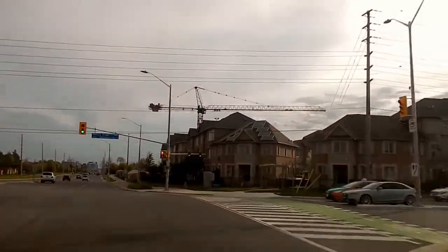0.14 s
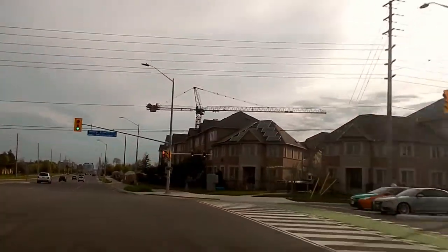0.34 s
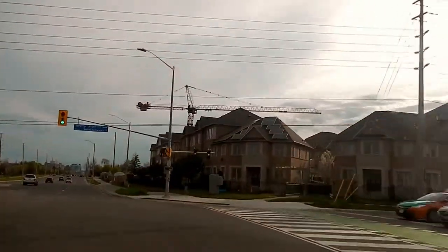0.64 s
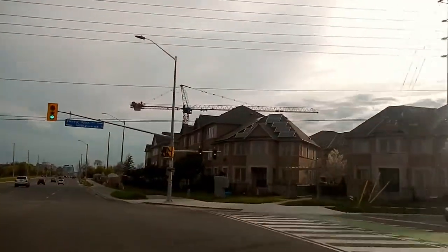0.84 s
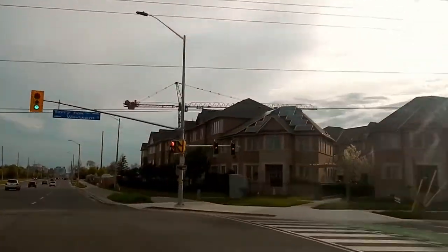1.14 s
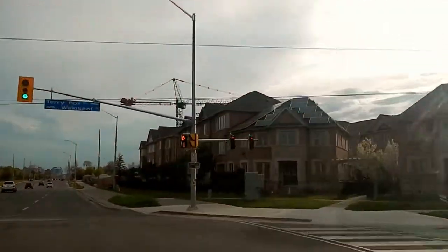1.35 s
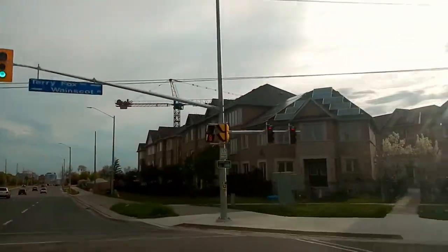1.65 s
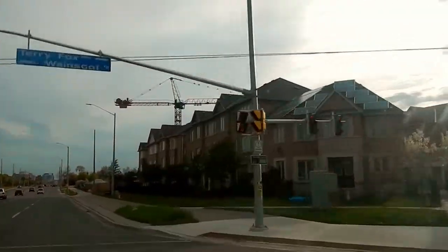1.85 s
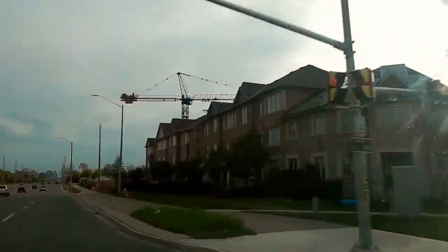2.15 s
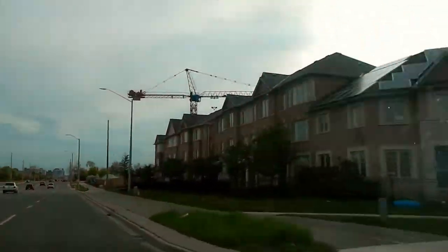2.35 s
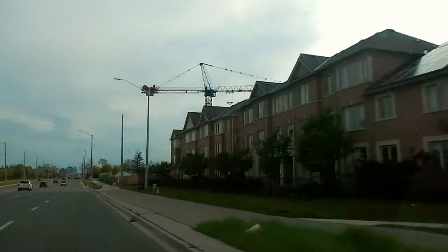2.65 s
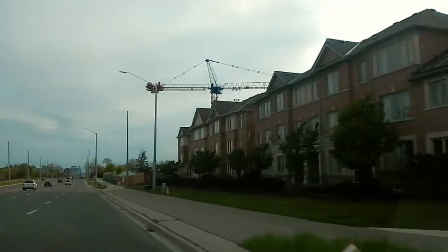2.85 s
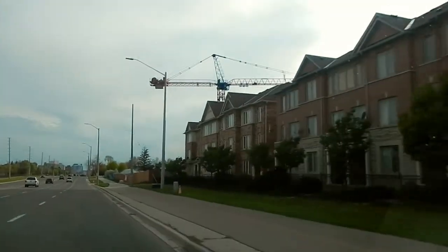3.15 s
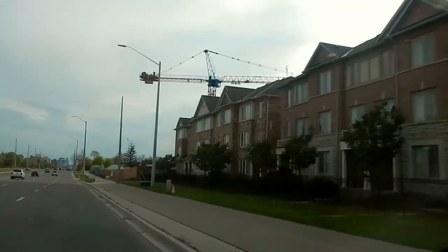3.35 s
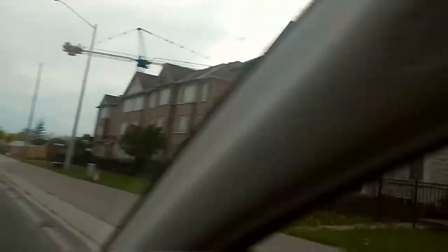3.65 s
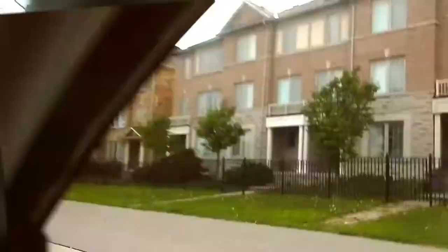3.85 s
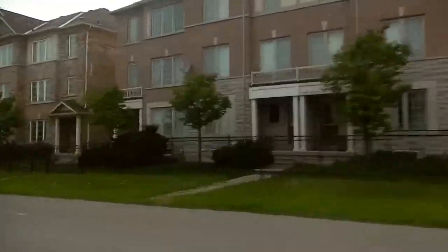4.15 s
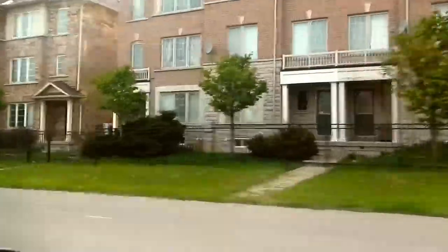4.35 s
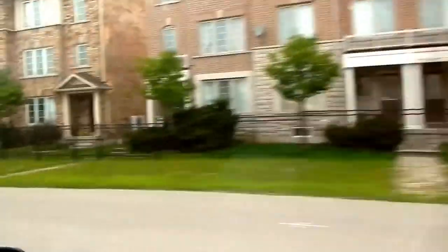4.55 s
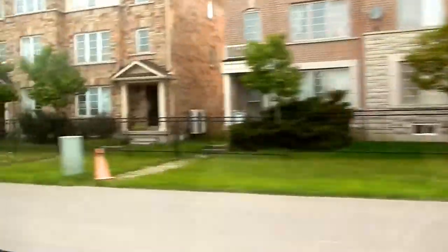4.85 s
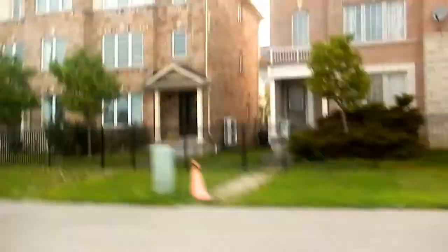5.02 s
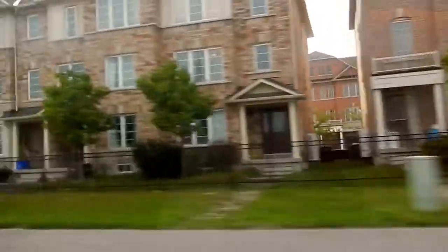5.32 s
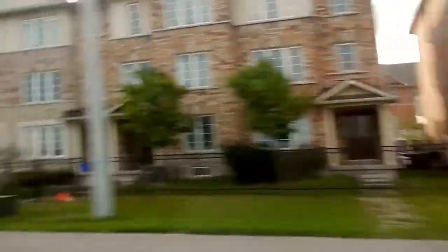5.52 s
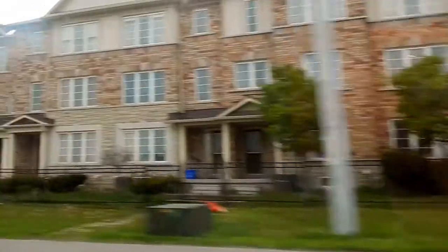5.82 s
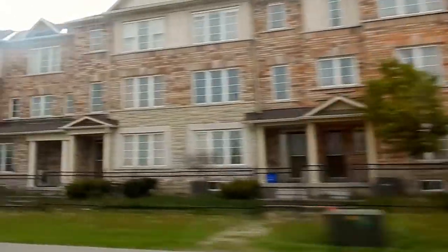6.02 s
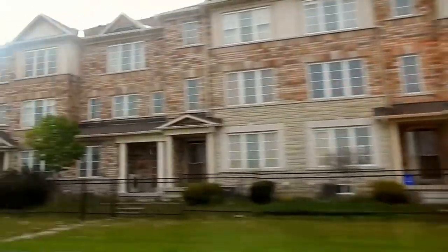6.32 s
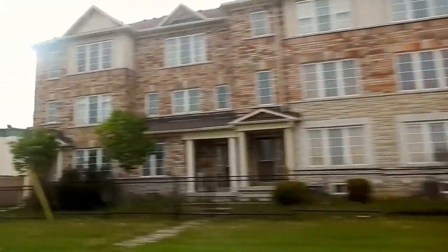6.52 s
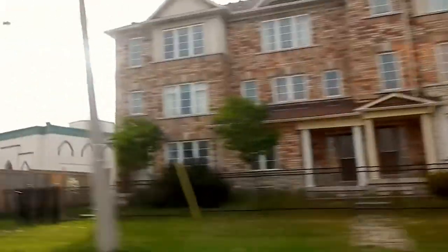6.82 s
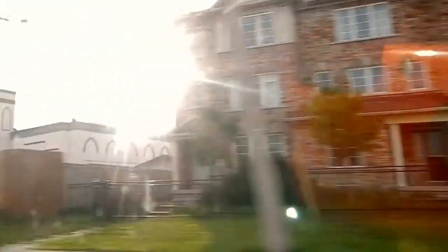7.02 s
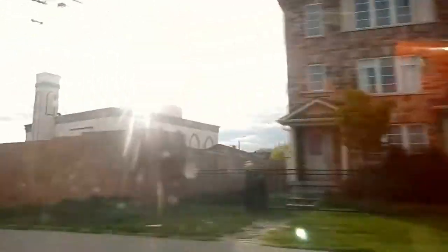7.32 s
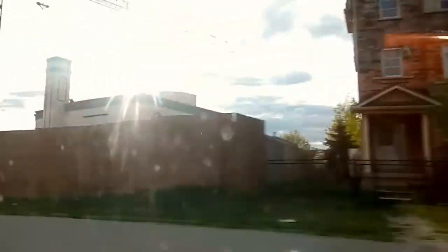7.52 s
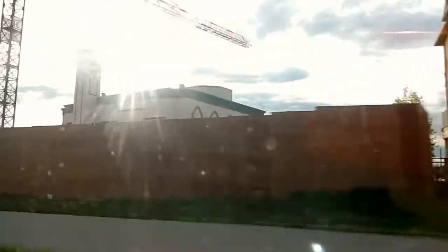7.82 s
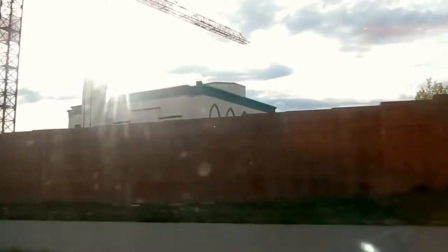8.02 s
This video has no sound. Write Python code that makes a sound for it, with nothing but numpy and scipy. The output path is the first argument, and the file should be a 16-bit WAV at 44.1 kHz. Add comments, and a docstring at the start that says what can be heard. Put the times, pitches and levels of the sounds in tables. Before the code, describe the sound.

Steady boomy car-cabin road noise with soft bumps grows fuller after a few seconds, joined by fabric rustling, a brief seat creak and small rattles.

```python
"""Inside a car, microphone turned to the side window

A suburban road heard from the cabin, the speed drifting a little. Noise bands filtered to the resonances of body,
cabin, floor pan, tyres and glass make the road; struck modes make seams and dips. Midway a passenger turns the
microphone from the windscreen to the side window: most of the road grows louder. Shaped noise makes the clothing
rustle and snag; short squeaks make the seat creak; noise bursts and struck modes make trim tick and chink."""
import sys
import numpy as np
from scipy.fft import rfft, irfft
from scipy.io import wavfile
from scipy.ndimage import uniform_filter1d, map_coordinates

SR = 44100
rng = np.random.default_rng(int(sys.argv[2]) if len(sys.argv) > 2 else 0)


def transcribe(u):
    """Save the signal u as a 16-bit wav file named by the first command-line argument.

    u: samples, shape (n,) or (channels, n), limited to [-1, 1]; the rate is SR.
    q: integer samples, one column per channel.
    """
    v = np.clip(np.atleast_2d(u).T, -1, 1)
    q = np.round(v * 32767).astype(np.int16)
    wavfile.write(sys.argv[1], SR, q)


N = 360297
TIME = np.arange(N) / SR  # s
FREQ = np.maximum(np.fft.rfftfreq(N, 1 / SR), 1)  # Hz
BLOW_LENGTH = SR // 4  # samples in each short sound
BLOW_TIME = TIME[:BLOW_LENGTH]

# Levels of layers and events are those ahead of the stereo tilt and the microphone's own response.
# Levels of modes and noise colours are relative within their sound.

# Where the microphone points. Each row: time in seconds, direction from 0 (windscreen) to 1 (side window).
MIC_DIRECTION = [(0, 0.038), (3.33, 0.11), (3.7, 0.79), (4.3, 0.99), (8.17, 0.84)]
# Speed of the car. Each row: time in seconds, share of cruising speed.
CAR_SPEED = [(0, 0.97), (2.7, 1), (4.3, 0.94), (6.7, 1.012), (8.17, 0.99)]
SPEED_LAW_DB = 32.5  # road noise gained per tenfold speed

# Road layers at cruising speed: dB at the windscreen, dB at the side window.
SHAKE_DB, BOOM_DB, FLOOR_DB = (-34, -34.5), (-27.5, -26), (-35.5, -26.5)
DRONE_DB, ROAR_DB, WHINE_DB = (-38, -32.5), (-40, -35), (-75.5, -55)
SHAKE_SHARE = 0.46  # how far the body follows the boom's changes with the asphalt, in dB per dB

# The body on its springs. Each row: pitch in Hz, width in Hz, level in dB.
BODY_MODES = [(37.9, 5.3, 2.5), (20, 39, -13)]
# Resonances of the cabin air, of the floor pan, of the tyres, and of doors and glass in the roar.
# Each row: pitch in Hz, width in Hz, level in dB at the windscreen, level in dB at the side window.
CABIN_MODES = [(58.9, 8.1, -1.5, -23.5), (82.8, 25.3, -9, 0), (104.6, 15.1, 2, -1), (122.5, 16.7, -3, -8)]
FLOOR_PAN_MODES = [(146, 24.7, 2, 2), (186.2, 16.6, 4.5, -5.5), (209.7, 15, 2, -6.5),
                   (262.5, 39.6, -5.5, -11.5)]
TYRE_MODES = [(374.2, 52, -11, 4), (402, 35.5, -4, -2), (426, 56.6, 1, -6.5), (488, 29.5, -6.5, -5)]
GLASS_MODES = [(672.5, 82, -5, 0.5), (832.6, 32, 2.5, -11), (934, 25, -6.5, -0.5), (1076, 117, -13.5, -6.5),
               (1309, 77, -22.5, -5), (1530, 130, -12, -15), (1861, 74, -15.5, -11.5)]
# Broad tread roar. Each row: frequency in Hz, noise density in dB per Hz.
ROAR_COLOUR = [(150, 3.5), (330, -0.5), (540, 0.5), (780, -2), (1000, -7.5), (1400, -14), (1900, -15),
               (2200, -25.5), (2900, -28.5), (3700, -23), (4600, -32.5), (5700, -34), (7200, -51),
               (15000, -47)]
# Rougher (+) and smoother (-) stretches of asphalt. Each row: start in seconds, length in seconds,
# change of the cabin boom in dB, of the floor pan in dB, of the tyre drone in dB.
ASPHALT_PATCHES = [(0, 0.22, -4.5, 2, -1), (0.987, 0.22, 1, 0, -3), (1.198, .33, -2, -0.5, 0),
                   (1.9, 0.19, -4.5, -1, -0.5), (3.15, 0.1, 2, 1, 0.5), (3.256, 0.14, -4, 0.5, -1.5),
                   (3.415, 0.44, 5.5, 0, 3), (4.157, 0.39, 0, 1, 1), (4.553, 0.081, 6.5, 0, 0),
                   (4.723, 0.49, 2.5, 2.5, 1), (5.206, 0.072, -8, -4, -1), (5.58, 0.34, -1, -0.5, -1),
                   (6.06, .18, 1.5, 1.5, 0.5), (6.22, 0.61, 6.5, 1, 0.5), (7.01, 0.15, -2, -1, -2),
                   (7.196, 0.22, 5, -0.5, -1), (7.52, .4, 5, 0, 1)]
PATCH_EDGE_S = 0.025  # the time it takes to roll onto or off a patch
# Coarse and fine asphalt. Each row: peak in seconds, rise in seconds, fall in seconds, change of the roar in dB.
ROAR_SURGES = [(3.31, 0.035, 0.076, -1.5), (3.42, 0.028, 0.028, 2), (3.51, .03, .03, -2.5),
               (3.76, .04, .04, 1), (4.315, 0.038, .025, 3), (4.39, 0.017, .04, 1.5),
               (4.65, .05, 0.036, -0.5), (4.82, 0.068, .05, 1), (5.23, .04, 0.053, -0.5),
               (5.57, .04, 0.036, -2), (6.45, 0.032, 0.11, 1), (6.79, 0.11, 0.031, 1)]
# Whine of the tread pattern. Each row: peak in seconds, rise in seconds, fall in seconds, level in dB.
WHINE_SWELLS = [(4.4, 0.27, .25, -56), (5.15, 0.25, 0.25, -49.5), (6.75, 0.64, 0.65, -50.5)]
# Narrow bands within the whine. Each row: pitch in Hz, width in Hz, level in dB.
WHINE_BANDS = [(1291, 25, -5), (1366, 38, -6), (1546, 32, 1.5), (1594, 26, 0.5)]
WHINE_WAVER, WHINE_FLUTTER_DB = 0.006, 1.6  # wander as a share of pitch; random swing of level

# Seams under the tyres, and dips in the road. Each row: start in seconds, peak level in dB, pitch in Hz.
SEAM_KNOCKS = [(.44, -28, 425), (.958, -23, 423), (1.02, -22, 420), (1.177, -21.5, 420), (1.438, -22, 417),
               (1.548, -25, 400), (1.646, -22.5, 412), (2.711, -24.5, 444), (3.152, -21.5, 417),
               (4.08, -24, 363), (4.695, -23, 388), (5.318, -21, 425), (6.135, -24, 382), (6.228, -21, 420),
               (6.326, -20, 393), (6.846, -24, 398), (7.554, -22, 400)]
DIP_THUDS = [(.633, -18, 118), (1.068, -18, 96), (1.68, -20, 116), (1.841, -17, 108), (2.13, -17, 108),
             (3.44, -14.5, 94), (3.608, -14, 98), (3.73, -11, 89), (4.036, -17, 116), (4.307, -14, 100),
             (4.818, -15, 97), (6.233, -16, 97), (6.515, -13.5, 86), (6.594, -13, 96), (6.783, -14, 108),
             (7.345, -13, 96)]
# Modes of a seam knock and of a dip thud. Each row: multiple of the pitch, level in dB, t60 in seconds.
SEAM_RING = [(1, 1, 0.14), (.94, -9.5, 0.13), (1.16, -9.5, 0.039), (.52, -6.5, 0.05), (2.19, -18.5, 0.034)]
DIP_RING = [(1, 14.5, 0.17), (1.34, -9, 0.02)]

# Clothing over the seat, close by. Each row: peak in seconds, rise in seconds, fall in seconds,
# level of the rustle in dB, level of the fibres' sheen in dB.
CLOTH_STROKES = [(.8, 0.13, 0.19, -63, -88), (1.35, 0.13, 0.13, -62, -90), (2.08, 0.13, 0.088, -58, -84),
                 (3.75, 0.5, .42, -49.5, -71.5), (3.6, .06, .06, -57, -78), (3.69, .03, 0.032, -47.5, -70),
                 (3.78, 0.015, 0.057, -45.5, -64.5), (3.875, .02, .03, -53, -65),
                 (4.2, 0.23, 0.18, -51, -71), (4.31, 0.045, 0.13, -43.5, -63),
                 (4.47, 0.079, 0.054, -46, -64), (4.57, 0.065, 0.058, -49.5, -67),
                 (4.665, 0.067, 0.051, -47.5, -64), (4.79, .08, .05, -61, -77),
                 (4.99, 0.075, 0.1, -51.5, -66), (5.12, .06, 0.077, -54, -76),
                 (5.218, 0.047, 0.033, -43.5, -71), (5.32, 0.066, 0.065, -54, -76),
                 (5.43, 0.067, 0.05, -46.5, -72), (5.51, 0.017, 0.027, -45, -60),
                 (5.565, 0.019, 0.018, -42.5, -60), (5.63, 0.066, 0.12, -47, -67),
                 (5.83, 0.16, 0.044, -46, -62.5), (5.93, 0.049, 0.05, -53, -67),
                 (6.745, 0.09, 0.062, -58, -83)]
# Colours of rustle and sheen. Each row: frequency in Hz, noise density in dB per Hz.
CLOTH_COLOUR = [(700, 0.5), (1500, 6.5), (2200, 2), (2600, -2.5), (3000, 2.5), (3800, 6.5), (4500, -3),
                (5750, -1), (7000, -12), (8100, -20.5), (15000, -33)]
SHEEN_COLOUR = [(6000, -19), (8200, -6.5), (9400, -1.5), (11500, -5.5), (15000, -20)]
CLOTH_SPLIT_HZ, CLOTH_PATCHY_DB = 4700, 1.3  # the rustle flickers apart below and above this frequency
# Cloth jerking free. Each row: start in seconds, peak level in dB.
CLOTH_SNAGS = [(3.777, -34), (3.786, -36), (3.81, -37), (3.836, -37), (4.335, -36), (4.351, -35),
               (4.482, -37), (5.217, -33)]
SNAG_T60_S = 0.015

# Creaks of the seat. Each row: start in seconds, number of slips, base gap in seconds, peak level of the
# first slip in dB before scatter, fall in dB per slip.
SEAT_CREAKS = [(5.5076, 2, .0097, -26.5, 5), (5.5627, 1, .012, -22, 0), (5.5848, 8, .0123, -23.6, .5)]
SLIP_SLOWING_S, SLIP_JITTER_S = 0.00054, 0.0002  # each gap outlasts the one before; random timing
SLIP_SCATTER_DB, CREAK_RIGHT_DB = 0.8, 3  # random level; how much louder the squeak is on the right
SQUEAK_HZ, SQUEAK_S, SQUEAK_SUB_DB = 3770, 0.0022, -9  # mean pitch; length; the octave below
SNAP_DB, SNAP_T60_S = -2, 0.016  # the snap, against the squeak's main tone
# Colour of the snap. Each row: frequency in Hz, noise density in dB per Hz.
SNAP_COLOUR = [(700, -3), (1800, 4), (2500, -1.5), (2900, 0), (4200, -3), (4900, -12), (6300, -9),
               (7300, -22), (12000, -34)]

# Plastic trim. Each row: start in seconds, peak level in dB, pitch in Hz, width in Hz, t60 in seconds.
TRIM_TICKS = [(2.173, -43, 4600, 2200, .04), (4.305, -30, 1500, 1200, .025), (5.834, -35, 4000, 1200, .02),
              (5.866, -33, 4150, 500, .008), (6.098, -45, 4000, 800, .03), (6.352, -45, 4400, 800, .012),
              (6.725, -43.5, 3600, 700, .03), (7.183, -48, 5500, 900, .02), (7.624, -45.5, 5550, 350, .06),
              (7.928, -39.5, 4000, 800, .07), (8.001, -47, 5750, 450, .02), (8.017, -42, 4000, 500, .02)]
CRACK_DB, CRACK_T60_S = -8, 0.025  # the broad crack of contact, against the tick
# A small loose metal part. Each row: start in seconds, peak level in dB of the knock, of the bounce, of the chink.
METAL_CHINKS = [(4.817, -38.5, -45, -55.5), (6.4177, -32.5, -39, -48.5), (7.0015, -37, -38, -53)]
BOUNCE_S = 0.0035  # from knock to bounce
# Modes of its knock and of its chink. Each row: pitch in Hz, level in dB, t60 in seconds.
KNOCK_RING = [(1870, 3, .02), (2310, 1, .02), (2800, -1, .018), (3600, 1, .035), (4150, -1, .04)]
CHINK_RING = [(9300, 1, .05), (9340, -3, .045), (9910, -12, .04), (11900, -16, .07), (12200, -12, .07),
              (12400, -10.5, .07)]
KNOCK_CRACK_DB, KNOCK_CRACK_T60_S = -0.5, 0.055  # the broad crack of contact, against the knock
# Colour of that crack. Each row: frequency in Hz, noise density in dB per Hz.
KNOCK_CRACK_COLOUR = [(900, -4), (1900, 2), (2900, 1), (3500, 1), (4300, 0), (4900, -16), (6500, -15),
                      (7500, -21), (14000, -22)]

# Ventilation and microphone hiss. Each row: frequency in Hz, noise density in dB per Hz.
HISS_COLOUR = [(500, 13.5), (2500, 13), (3700, 7.5), (4600, -6.5), (6300, 4), (7400, 0.5), (10000, -1),
               (13500, -2.5), (15600, 2)]

# Spread between the two microphone ports. Each row: frequency in Hz, side minus mid in dB.
PORT_WIDTH = [(60, -24), (300, -25), (700, -17), (1300, -12.5), (2400, -4.5), (4400, -2), (8000, -1.5),
              (15000, -12)]
# Balance of the ports. Each row: frequency in Hz, left minus right in dB.
PORT_BALANCE = [(700, -2), (1300, -1), (2400, -0.5), (4400, 0.5)]
# Microphone nulls. Each row: frequency in Hz, width in Hz, depth from 0 to 1.
MIC_NULLS = [(3210, 300, 0.99), (5020, 49, 0.8)]
TOP_HZ, EDGE_S = 15780, 0.004  # nothing passes above; fade at either end


def road():
    """All the rolling sound, shaken into the cabin through body, floor, tyres and glass."""
    boom_db, floor_db, drone_db = asphalt()
    shake = body_shake(SHAKE_SHARE * boom_db)
    boom = steady(cabin(CABIN_MODES), 0.15) * rolling(BOOM_DB, boom_db)
    pan = steady(cabin(FLOOR_PAN_MODES), 0.25) * rolling(FLOOR_DB, floor_db)
    drone = steady(cabin(TYRE_MODES), 0.29) * rolling(DRONE_DB, drone_db)
    return shake + boom + pan + drone + tread_roar() + tread_whine()


def asphalt():
    """Decibels that the patches add to the cabin boom, the floor pan and the tyre drone."""
    total = 0
    for s, length, *layers_db in ASPHALT_PATCHES:
        on = np.clip(0.5 + np.minimum(TIME - s, s + length - TIME) / PATCH_EDGE_S, 0, 1)
        total = total + np.outer(layers_db, on)
    return total


def rolling(levels_db, rough_db=0):
    """Gain of a road layer: it follows speed, asphalt and the turn to the side window."""
    front_db, side_db = levels_db
    turn_db = curve(MIC_DIRECTION) * (side_db - front_db)
    speed_db = SPEED_LAW_DB * np.log10(curve(CAR_SPEED))
    return undb(front_db + turn_db + speed_db + rough_db)


def cabin(modes):
    """Noise from the road texture drives each mode; its strength follows the microphone's direction."""
    turn = np.clip(curve(MIC_DIRECTION), 0, 1)
    total = 0
    for hz, width, front_db, side_db in modes:
        total = total + field(resonance(hz, width)) * undb(front_db + turn * (side_db - front_db))
    return total


def body_shake(rough_db):
    """The body rocks on its springs: noise through deep resonances."""
    gain = sum(undb(db) * resonance(hz, width) for hz, width, db in BODY_MODES)
    return steady(field(gain), 0.2) * rolling(SHAKE_DB, rough_db)


def tread_roar():
    """Broad tread noise rings doors and glass; it flutters at random and surges with the asphalt."""
    tread = cabin(GLASS_MODES) + field(colour(ROAR_COLOUR))
    tread = tread * undb(0.99 * walk(30))
    surge_db = sum(db * swell(s, rise, fall) for s, rise, fall, db in ROAR_SURGES)
    return steady(tread, 0.34) * rolling(ROAR_DB, surge_db)


def tread_whine():
    """The tread pattern sings in narrow noise bands that waver in pitch and swell up and fade."""
    bands = sum(field(undb(db) * resonance(hz, width)) for hz, width, db in WHINE_BANDS)
    bands = waver(bands, WHINE_WAVER, rate=6) * undb(WHINE_FLUTTER_DB * walk(18))
    singing = sum(undb(db) * swell(s, rise, fall) for s, rise, fall, db in WHINE_SWELLS)
    return steady(bands, 0.27) * np.hypot(rolling(WHINE_DB), singing)


def bumps():
    """Seams ring the tyres; dips thud through the floor: decaying struck modes, equal at both ports."""
    out = np.zeros(N)
    for s, db, hz in SEAM_KNOCKS:
        add(out, s, ring(SEAM_RING, rise=0.004, scatter=0.006, pitch=hz), db)
    for s, db, hz in DIP_THUDS:
        add(out, s, ring(DIP_RING, rise=0.0082, scatter=0.0048, pitch=hz), db)
    return out


def clothing():
    """With every stroke, fibres catch and let go in a grainy rustle with a thin sheen on top."""
    power = 0
    for s, rise, fall, rustle_db, sheen_db in CLOTH_STROKES:
        power = power + (undb([[rustle_db], [sheen_db]]) * swell(s, rise, fall)) ** 2
    rustle_level, sheen_level = np.sqrt(power)
    grain = undb(1.9 * walk(700) + 0.9 * walk(60))
    low = 1 / (1 + (FREQ / CLOTH_SPLIT_HZ) ** 8)
    cloth = 0
    for share in (low, 1 - low):
        cloth = cloth + field(colour(CLOTH_COLOUR) * np.sqrt(share)) * undb(CLOTH_PATCHY_DB * walk(45))
    rustle = steady(cloth * grain, 0.32) * rustle_level
    sheen = steady(field(colour(SHEEN_COLOUR)) * grain, 0.12) * sheen_level
    return rustle + sheen


def snags():
    """The cloth catches and lets go with a short rasp of decaying noise."""
    out, cloth = np.zeros((2, N)), field(colour(CLOTH_COLOUR))
    for s, db in CLOTH_SNAGS:
        add(out, s, burst(cloth, s, SNAG_T60_S), db)
    return out


def creak():
    """The seat sticks and slips, singly or in slowing runs; each slip is a tiny squeak with a snap."""
    out, crackle = np.zeros((2, N)), field(colour(SNAP_COLOUR))
    sliding = np.sqrt(np.abs(np.sin(np.pi * np.minimum(BLOW_TIME / SQUEAK_S, 1))))
    for start, count, gap, first_db, fall_db in SEAT_CREAKS:
        for k in range(count):
            s = start + k * (gap + k * SLIP_SLOWING_S / 2) + SLIP_JITTER_S * rng.standard_normal()
            phase = 2 * np.pi * SQUEAK_HZ * (1 + 0.015 * rng.standard_normal()) * BLOW_TIME
            squeak = sliding * (np.sin(phase) + undb(SQUEAK_SUB_DB) * np.sin(phase / 2))
            # the left port hears it first
            ports = np.array([squeak * undb(-CREAK_RIGHT_DB), np.roll(squeak, shift=2)])
            slip = ports + undb(SNAP_DB) * burst(crackle, s, SNAP_T60_S)
            add(out, s, slip, first_db - k * fall_db + SLIP_SCATTER_DB * rng.standard_normal())
    return out


def trim():
    """Dry ticks of plastic trim: a band of noise dies away, with a broad crack of contact."""
    out, crackle = np.zeros((2, N)), field(colour(SNAP_COLOUR))
    for s, db, hz, width, t60 in TRIM_TICKS:
        tick = field(resonance(hz, width))[:, :BLOW_LENGTH] * fade(t60, rise=0.0012)
        add(out, s, tick, db)
        add(out, s, burst(crackle, s, CRACK_T60_S), db + CRACK_DB)
    return out


def loose_metal():
    """A small loose metal part knocks on its mount, bounces once and chinks: struck modes and cracks."""
    out, blunt = np.zeros((2, N)), field(colour(KNOCK_CRACK_COLOUR))
    for s, knock_db, bounce_db, chink_db in METAL_CHINKS:
        for lag, db in ((0, knock_db), (BOUNCE_S, bounce_db)):
            knock = ring(KNOCK_RING, rise=0.0008, scatter=0.03)
            add(out, s + lag, np.array([knock, np.roll(knock, shift=2)]), db)
            add(out, s + lag, burst(blunt, s + lag, KNOCK_CRACK_T60_S), db + KNOCK_CRACK_DB)
        chink = ring(CHINK_RING, rise=0.012, scatter=0.0005)
        add(out, s + BOUNCE_S, np.array([chink, np.roll(chink, shift=1)]), chink_db)
    return out


def air_hiss():
    """Ventilation and microphone hiss: coloured noise at a steady level."""
    return steady(field(colour(HISS_COLOUR)), 1.0) * undb(-60.5)


def undb(db):
    """Decibels to gain."""
    return 10 ** (np.asarray(db) / 20)


def curve(rows):
    """Second column of a table, joined by straight lines in time."""
    rows = np.asarray(rows, float)
    return np.interp(TIME, rows[:, 0], rows[:, 1])


def colour(points):
    """Gain at every frequency from (Hz, dB) points, joined along log frequency."""
    hz, db = np.transpose(points)
    return undb(np.interp(np.log(FREQ), np.log(hz), db))


def resonance(hz, width):
    """Steep-sided resonance: a band-pass applied twice, about width Hz between half-power points."""
    return 1 / (1 + 1j * (FREQ / hz - hz / FREQ) * hz / (np.pi / 2 * width)) ** 2


def shape(x, gain):
    """Filter x by a frequency response."""
    return irfft(rfft(x) * gain, N)


def field(gain):
    """Coloured noise at both ports: alike in the bass, more diffuse higher up."""
    mid, side = rfft(rng.standard_normal((2, N)))
    return irfft(gain * (mid + side * colour(PORT_WIDTH) * np.array([[1], [-1]])), N)


def steady(x, span):
    """Hold the level near 1 over stretches of span seconds; faster flutter stays."""
    power = uniform_filter1d(x.mean(axis=0) ** 2, int(span * SR))
    return x / np.sqrt(uniform_filter1d(power, int(span * SR / 2)))


def walk(rate):
    """Random levels, rate of them a second, joined by straight lines; spread about 0.8."""
    knots = rng.standard_normal(4096)
    return np.interp(TIME * rate % 4096, np.arange(4096), knots)


def swell(s, rise, fall):
    """A rounded swell that peaks at time s."""
    return np.exp(-((TIME - s) / np.where(TIME < s, rise, fall)) ** 2)


def waver(x, depth, rate):
    """Let the pitch of a steady sound wander, by reading it at an uneven pace."""
    place = np.cumsum(1 + depth * walk(rate))
    return np.array([map_coordinates(port, [place], order=3, mode="wrap") for port in x])


def add(out, s, sound, db):
    """Mix a short sound in at time s with the given peak level."""
    i = int(s * SR)
    scaled = sound * undb(db) / np.abs(sound).max()
    out[..., i:i + sound.shape[-1]] += scaled[..., :N - i]


def fade(t60, rise):
    """Envelope of a blow: a soft rise, then an exponential fall of 60 dB in t60 seconds."""
    return (1 - np.exp(-BLOW_TIME / rise)) * np.exp(-np.log(1000) * BLOW_TIME / t60)


def ring(modes, rise, scatter, pitch=1):
    """Struck modes, scaled by the pitch and slightly detuned on every blow."""
    total = 0
    for hz, db, t60 in modes:
        detuned = pitch * hz * (1 + scatter * rng.standard_normal())
        total = total + undb(db) * fade(t60, rise) * np.sin(2 * np.pi * detuned * BLOW_TIME)
    return total


def burst(noise, s, t60):
    """A sharp, quickly dying piece of noise with peak 1."""
    piece = np.roll(noise, -int(s * SR), axis=1)[:, :BLOW_LENGTH] * fade(t60, rise=0.0002)
    return piece / np.abs(piece).max()


def scene():
    """Everything in the cabin; lows and mids lean to the right port, the treble slightly to the left."""
    handling = clothing() + snags() + creak()
    inside = road() + bumps() + handling + trim() + loose_metal() + air_hiss()
    tilt = np.sqrt(colour(PORT_BALANCE))
    return shape(inside, np.array([tilt, 1 / tilt]))


def record(dry):
    """The microphone has two narrow nulls; the top is cut steeply and both ends are faded."""
    nulls = np.prod([1 - depth / (1 + 2j * (FREQ - hz) / width) for hz, width, depth in MIC_NULLS], axis=0)
    edges = np.clip(np.minimum(TIME, TIME[::-1]) / EDGE_S, 0, 1)
    return shape(dry * edges, nulls * np.clip((TOP_HZ - FREQ) / 50, 0, 1))


dry = scene()
out = record(dry)
transcribe(out)
```